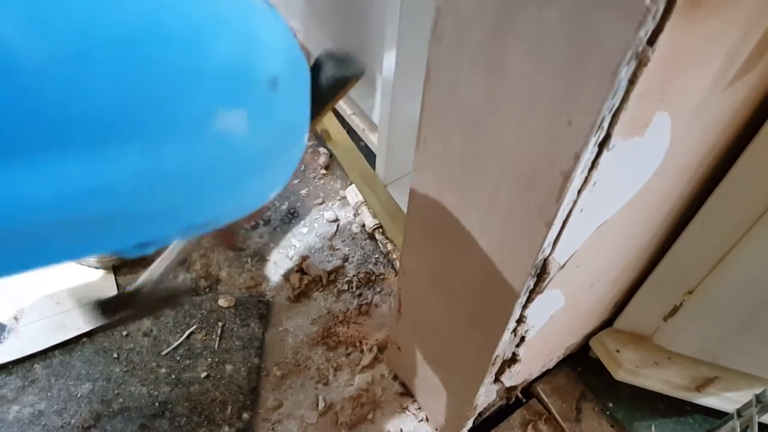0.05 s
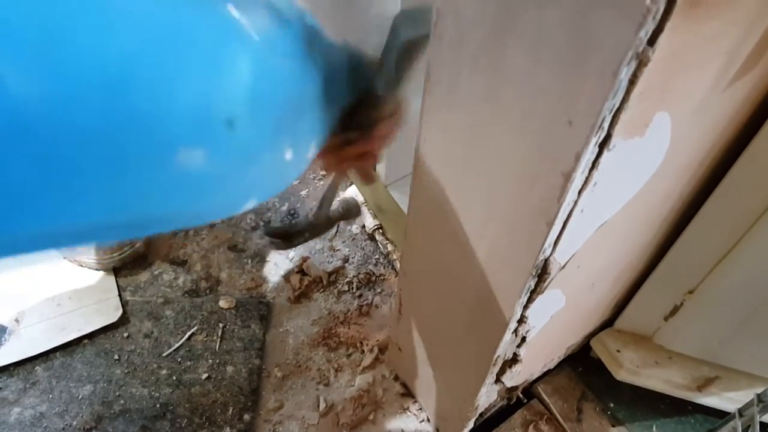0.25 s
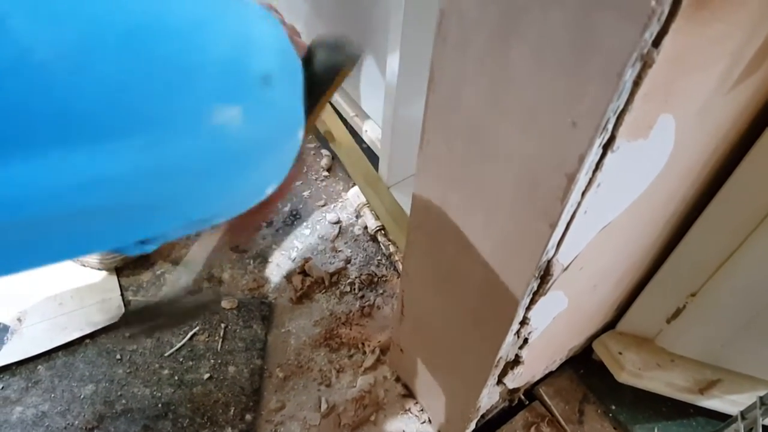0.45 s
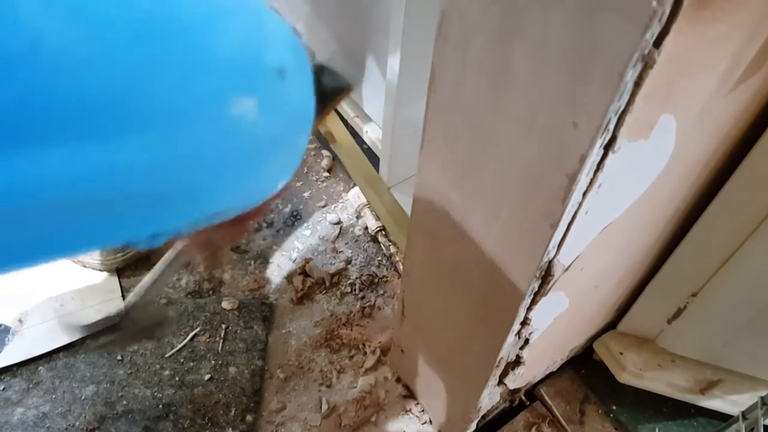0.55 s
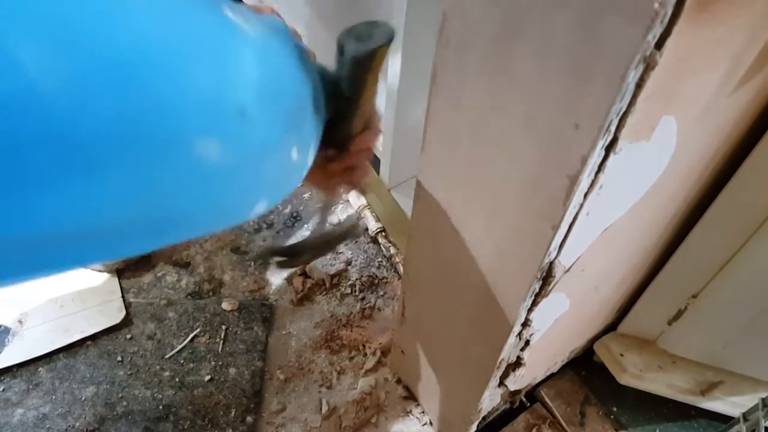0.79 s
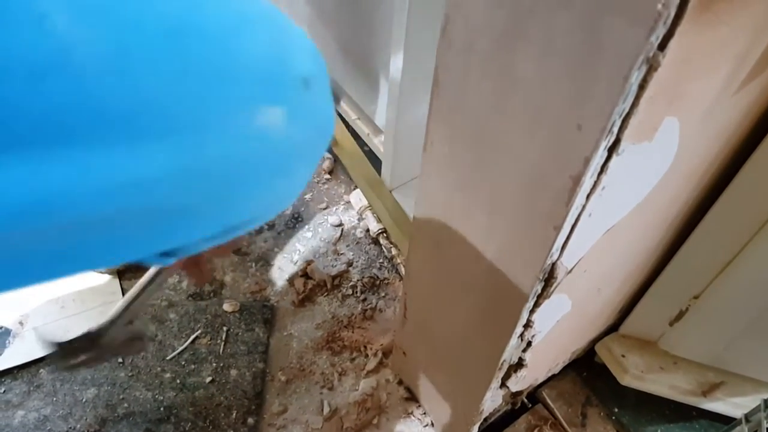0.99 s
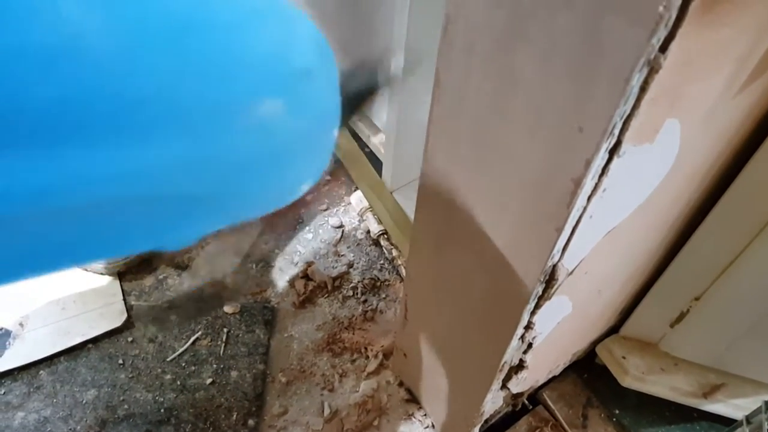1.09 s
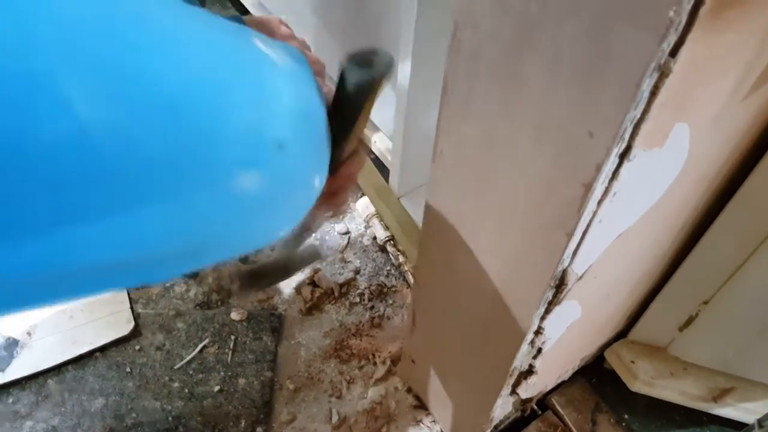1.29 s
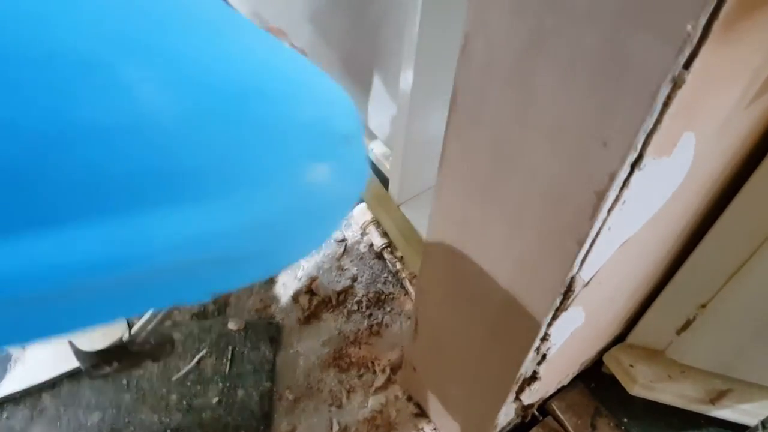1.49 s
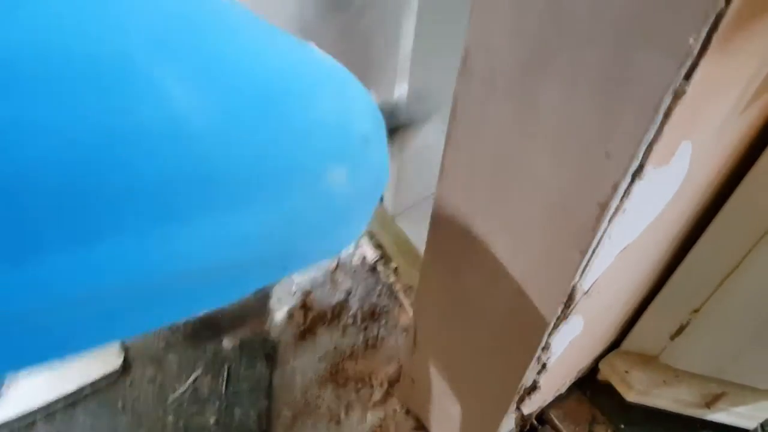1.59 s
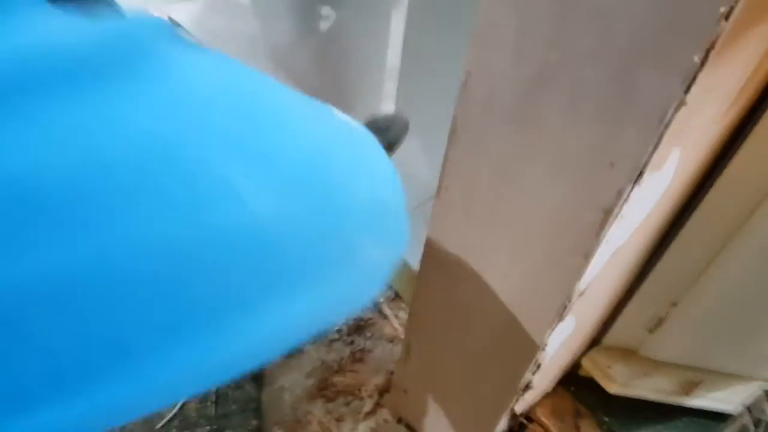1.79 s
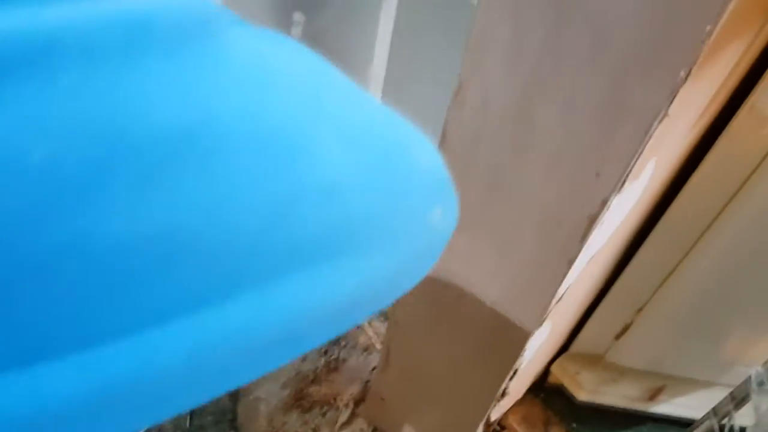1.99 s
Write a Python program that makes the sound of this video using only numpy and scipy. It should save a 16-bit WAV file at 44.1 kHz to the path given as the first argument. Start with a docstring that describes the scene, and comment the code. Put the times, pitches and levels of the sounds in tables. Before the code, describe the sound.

Four evenly paced, heavy thuds sound close to the microphone as a steel tool hits a stone floor edge. A small bare room echoes briefly after each, with slight metallic ringing, crumbling grit and light scraping over rubble in between.

```python
"""A heavy steel hand tool strikes a masonry floor edge about twice a second, close by in a small bare room.
Each blow thumps the slab, cracks the stone and fills the room with reflections.
The steel rings as it skids on, and grit trickles. Between blows the tool drags lightly over the rubble.
The building rumbles faintly underneath."""
import sys
import numpy as np
from scipy import signal
from scipy.fft import rfft, irfft
from scipy.io import wavfile
from scipy.ndimage import uniform_filter1d, minimum_filter1d

SR = 44100
rng = np.random.default_rng(int(sys.argv[2]) if len(sys.argv) > 2 else 0)


def pcm_store(signal):
    """Save signal as 16-bit PCM."""
    levels = np.round(np.clip(np.atleast_2d(signal), -1, 1) * 32767)
    wavfile.write(sys.argv[1], SR, levels.astype(np.int16).T)


N = 90404
TIME_S = np.arange(N) / SR
BIN_HZ = np.arange(N // 2 + 1) * SR / N


# Each row: start in seconds, gains in dB of thump, tick, crush and grit, grit hold in seconds,
# steel gain in dB, skid length in seconds. The first blow is already dying away.
BLOW_EVENTS = [(-.225, -3, 5, 3, -56, 0.037, -28.5, 0.039), (0.2095, -1, 7, 3.5, -58.5, 0.063, -50.5, .02),
               (0.6655, -1, 8, 5.5, -48, 0.082, -38, 0.042), (1.1434, 0, 3, 3, -47.5, 0.16, -41, 0.15),
               (1.6472, -2, 3.5, 4, -52, 0.09, -44, 0.07)]

def blows(room_lag_s=0.0036):
    """Each blow drives slab, room, stone, grit and steel; reflections trail the direct thump."""
    shared_noise, body = noise(), thump()
    out = 0
    for start_s, thump_db, tick_db, crush_db, grit_db, grit_s, steel_db, skid_s in BLOW_EVENTS:
        boom = undb(thump_db) * (body + later(room(shared_noise), room_lag_s))
        stone = crack(tick_db, crush_db) + undb(grit_db) * grit(grit_s)
        out += later(boom + stone + undb(steel_db) * steel(skid_s), start_s)
    return out


# Short, heavy slab modes. Each row: frequency in Hz, level in dB, T60 in seconds.
SLAB_RESONANCES = [(133.1, -20.5, 0.11), (239.1, -2.5, 0.069), (418.6, -11, 0.075), (495.4, -14, 0.074),
                   (805.4, -16, 0.036)]
# Longer floor and room modes. Each row: frequency in Hz, level in dB, T60 in seconds.
FLOOR_RESONANCES = [(110, -27, 0.17), (152.9, -20.5, 0.27), (205.6, -12.5, 0.27), (253, -15.5, 0.32),
                    (277.3, -9.5, 0.24), (361, -20.5, 0.17), (404.1, -17, 0.16), (519.4, -25, 0.14),
                    (566.6, -22, 0.29), (628, -23, 0.19), (760, -26, 0.095), (948, -24.5, 0.28),
                    (1266.5, -22, 0.19), (1371, -29.5, 0.21), (1555, -33, .26), (2021, -25, .22)]

def thump(gain_db=5.5, floor_lag_s=0.008, right_lag_s=0.0001):
    """The slab heaves for a few cycles; floor and room modes answer and ring on."""
    t = TIME_S - np.array([[0], [right_lag_s]])

    def ring(modes, rise_s, hold_s):
        return sum(undb(db) * envelope(rise_s, hold_s, t60_s) * np.sin(2 * np.pi * hz * t)
                   for hz, db, t60_s in modes)

    slab = ring(SLAB_RESONANCES, rise_s=0.0033, hold_s=0.0079)
    floor = ring(FLOOR_RESONANCES, rise_s=0.0068, hold_s=0)
    return -undb(gain_db) * (slab + later(floor, floor_lag_s))


# Contact tick spectrum. Each row: frequency in Hz, relative density in dB.
TICK_SPECTRUM = [(150, -40), (800, 14.5), (2500, -13.5), (5500, -29.5), (8500, -15.5), (11000, -30.5),
                 (16000, -32)]
# Crushing stone spectrum. Each row: frequency in Hz, relative density in dB.
CRUSH_SPECTRUM = [(200, -13.5), (500, 0.5), (850, 9), (1400, -15.5), (2400, -2.5), (3500, -12.5),
                  (5500, -26), (15000, -48)]

def crack(tick_db, crush_db):
    """A bright tick at first contact, then stone crushes under the edge."""
    tick = unit(colour(noise(), TICK_SPECTRUM)) * envelope(rise_s=0.0015, hold_s=0.00052, t60_s=0.04)
    crush = unit(colour(grains(), CRUSH_SPECTRUM)) * envelope(rise_s=0.003, hold_s=0.013, t60_s=0.02)
    return undb(tick_db - 18) * tick + undb(crush_db - 11.5) * crush


# Steel tool modes. Each row: frequency in Hz, level in dB, T60 in seconds.
TOOL_RESONANCES = [(1660, -7, .25), (1956, -7, .25), (2260, -6, .26), (2589, -7, .28), (2931, 0, .28),
                   (2945, -19, .75), (3308, -8, .27), (3690, -5, .27), (4087, -10, .27), (4480, -12, .27),
                   (4909, -13, .26), (5337, -14, .24), (5778, -25, .24), (7184, -23, .22), (7680, -24, .22),
                   (8235, -22, .2), (8785, -22, .2), (9216, -19, .2), (9700, -21, .2)]

def steel(skid_s, swell_share=0.7, judder_depth=0.35, judder_hz=45, spread_rad=1.4):
    """The tool's modes build and judder while its edge skids, then fade freely."""
    judder = judder_depth * (waver(judder_hz) + 1j * waver(judder_hz))
    out = 0
    for k, (hz, db, t60_s) in enumerate(TOOL_RESONANCES):
        judder_shift, phase_cycles = rng.random(2)
        uneven = 1 + np.roll(judder, int(judder_shift * N), axis=1)
        ear_phase = np.exp(1j * (-1) ** k * np.array([[0], [spread_rad]]))
        tone = np.exp(2j * np.pi * (hz * TIME_S + phase_cycles))
        out += undb(db) * (uneven * ear_phase * tone).imag * envelope(swell_share * skid_s, skid_s, t60_s)
    return out


# Reflection spectrum. Each row: frequency in Hz, relative density in dB.
ROOM_SPECTRUM = [(30, -29.5), (70, -12), (130, -5.5), (250, -3.5), (450, -4.5), (850, -3), (1500, -8.5),
                 (2300, -8), (3200, -22.5), (4400, -21), (5800, -48), (9000, -50), (15000, -54)]
# Room decay. Each row: frequency in Hz, T60 in seconds.
ROOM_DECAY = [(60, 0.55), (250, 0.41), (900, .3), (2500, .28), (6000, .28), (14000, .22)]
# Room width. Each row: frequency in Hz, side minus mid in dB.
ROOM_WIDTH = [(60, -53.5), (220, -8), (500, -7), (1100, -1.5), (2200, 0.5), (8000, -1.5)]

def room(shared_noise, gain_db=-13, crossover_hz=2600):
    """Dense reflections decay band by band; lows repeat from blow to blow, highs are new each time."""
    fresh_share = BIN_HZ ** 2 / (BIN_HZ ** 2 + crossover_hz ** 2)
    spectrum = rfft(shared_noise) * np.sqrt(1 - fresh_share) + rfft(noise()) * np.sqrt(fresh_share)
    centres_hz = 40 * 2 ** (np.arange(18) / 2)
    weights = undb(at(ROOM_SPECTRUM, centres_hz)) * np.sqrt(centres_hz)
    mid_side = 0
    for hz, weight in zip(centres_hz, weights / np.linalg.norm(weights)):
        band = np.cos(np.pi / 2 * np.clip(2 * np.log2((BIN_HZ + 1) / hz), -1, 1)) ** 2
        fade = envelope(rise_s=0.00082, hold_s=0, t60_s=at(ROOM_DECAY, hz))
        tail = irfft(spectrum * band, N) * fade
        tail *= np.linalg.norm(fade) / np.linalg.norm(tail, axis=1, keepdims=True)
        side = undb(at(ROOM_WIDTH, hz))
        mid_side += weight * tail * np.array([[1], [side]]) / np.hypot(1, side)
    return undb(gain_db) * stereo(*mid_side)


# Grit spectrum. Each row: frequency in Hz, relative density in dB.
GRIT_SPECTRUM = [(800, 6), (2500, 18.5), (4500, -9.5), (6000, 3), (9200, 8), (11000, -2.5), (15500, -7.5)]

def grit(hold_s):
    """Crumbs scatter after the blow."""
    return unit(colour(grains(), GRIT_SPECTRUM)) * envelope(rise_s=0.01, hold_s=hold_s, t60_s=0.25)


# Light drags. Each row: start in seconds, hold in seconds, level in dB, tilt in dB per octave.
DRAG_EVENTS = [(0.032, .16, -67, 0.5), (1.278, 0.021, -39, 0), (1.541, 0.023, -57, 2.5),
               (1.574, 0.0084, -51.5, 0), (1.832, 0.192, -63, 5.5)]
# Rubble spectrum. Each row: frequency in Hz, relative density in dB.
RUBBLE_SPECTRUM = [(150, 2), (260, 10), (450, 2), (1100, 5), (2300, -5.5), (3500, -5.5), (6000, -21.5),
                   (9200, -22.5), (11000, -32), (15500, -32.5)]

def drags():
    """The tool scrapes lightly over loose rubble."""
    out = 0
    for start_s, hold_s, db, tilt_db_per_oct in DRAG_EVENTS:
        scrape = unit(colour(grains(), RUBBLE_SPECTRUM, tilt_db_per_oct))
        out += later(undb(db) * scrape * envelope(rise_s=0.0068, hold_s=hold_s, t60_s=0.19), start_s)
    return out


# Building rumble spectrum. Each row: frequency in Hz, relative density in dB.
RUMBLE_SPECTRUM = [(25, -7.5), (52, 8.5), (85, 14.5), (120, -3.5), (165, 3.5), (260, 6), (420, -0.5),
                   (800, -14.5), (2000, -22.5), (3200, -27), (5000, -31), (10000, -44), (16000, -49.5)]

def rumble(gain_db=-64.5, side_db=-13):
    """Low steady rumble of the building."""
    mid, side = unit(colour(noise(), RUMBLE_SPECTRUM))
    return undb(gain_db) * stereo(mid, undb(side_db) * side)


def undb(db):
    return 10 ** (np.asarray(db) / 20)


def unit(x):
    return x / np.sqrt(np.mean(x ** 2))


def stereo(mid, side):
    return np.array([mid + side, mid - side])


def noise():
    return rng.standard_normal((2, N))


def grains(rate_per_s=9000, spread_db=3):
    """Dense clicks of uneven size."""
    clicks = (rng.random((2, N)) < rate_per_s / SR) * noise()
    return clicks * undb(spread_db * np.minimum(rng.exponential(size=(2, N)), 4))


def waver(bandwidth_hz):
    """Slow random motion, different at each ear."""
    return unit(irfft(rfft(noise()) * np.exp(-(BIN_HZ / bandwidth_hz) ** 2), N))


def at(points, hz):
    """Reads a table on a log-frequency axis."""
    points_hz, values = np.array(points, float).T
    return np.interp(np.log(hz + 1e-3), np.log(points_hz), values)


def colour(x, points, tilt_db_per_oct=0):
    """Minimum-phase filter with the given spectrum, tilted about 2 kHz."""
    octaves = np.log2(np.maximum(BIN_HZ, 100) / 2000)
    cepstrum = irfft(np.log(undb(at(points, BIN_HZ) + tilt_db_per_oct * octaves)), N)
    causal_fold = 2 * (np.arange(N) < N // 2) - (np.arange(N) == 0)
    response = irfft(np.exp(rfft(cepstrum * causal_fold)), N)[:4096]
    return signal.fftconvolve(x, response[None], axes=1)[:, :N]


def envelope(rise_s, hold_s, t60_s):
    """Linear attack; exponential release from hold_s on."""
    release = np.exp(-np.log(1000) * np.maximum(TIME_S - hold_s, 0) / t60_s)
    return np.minimum(TIME_S / rise_s, 1) * release


def later(x, start_s):
    """Moves a sound to its start; a negative start cuts its head."""
    shift = int(start_s * SR)
    delay, skip = max(shift, 0), max(-shift, 0)
    return np.pad(x, ((0, 0), (delay, skip)))[:, skip:skip + N]


# Stereo balance. Each row: frequency in Hz, left minus right in dB.
EAR_BALANCE = [(200, 0.3), (600, 0.2), (1100, 0), (2200, -5.4), (5000, -4), (12000, -1.5)]

def scene(bass_cut_hz=85):
    """Blows and drags, their deep bass trimmed, over the rumble; the treble leans right."""
    highpass = signal.butter(2, bass_cut_hz, "high", fs=SR, output="sos")
    mix = signal.sosfilt(highpass, blows() + drags()) + rumble()
    balance_db = np.array([[1], [-1]]) * at(EAR_BALANCE, BIN_HZ) / 2
    return irfft(rfft(mix) * undb(balance_db), N)


def record(dry, window_samples=133, top_hz=15900):
    """A fast limiter holds peaks at full scale; a steep low-pass cuts the top."""
    gain = 1 / np.maximum(np.abs(dry), 1)
    gain = uniform_filter1d(minimum_filter1d(gain, size=window_samples), size=window_samples)
    lowpass = signal.ellip(8, 0.2, 70, top_hz, fs=SR, output="sos")
    return signal.sosfilt(lowpass, dry * gain)


dry = scene()
out = record(dry)
pcm_store(out)
```